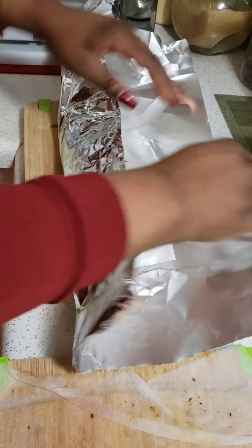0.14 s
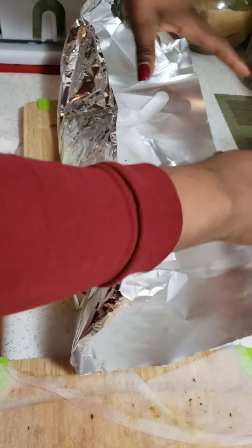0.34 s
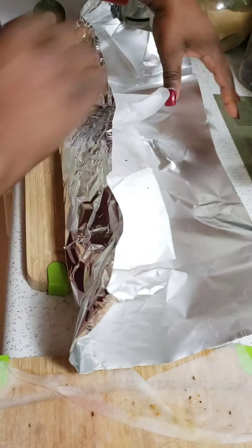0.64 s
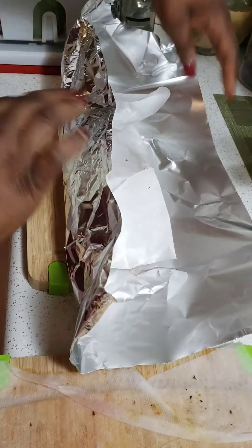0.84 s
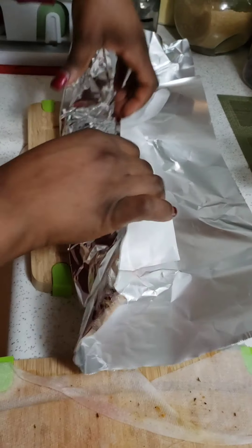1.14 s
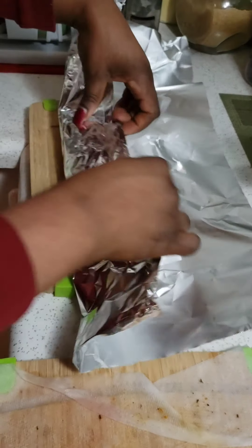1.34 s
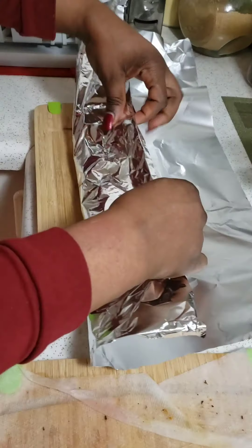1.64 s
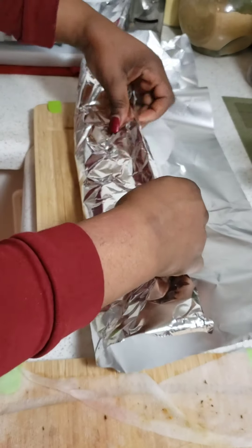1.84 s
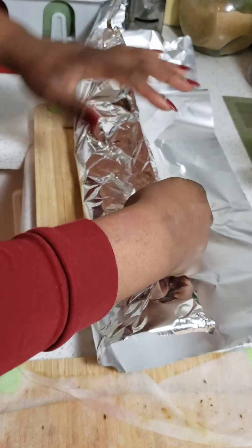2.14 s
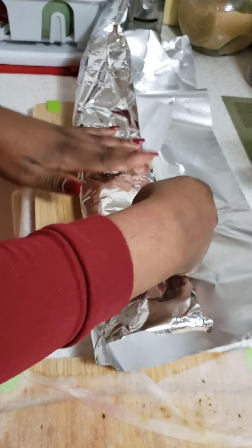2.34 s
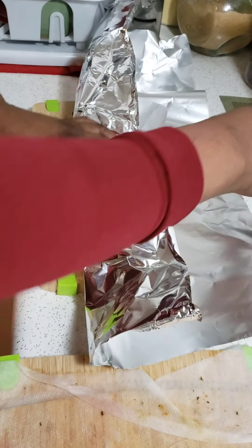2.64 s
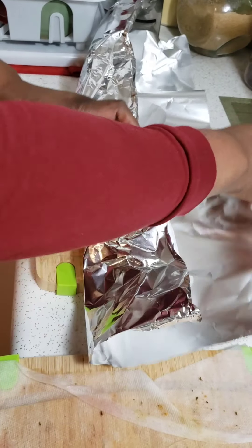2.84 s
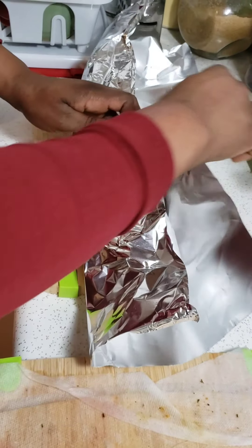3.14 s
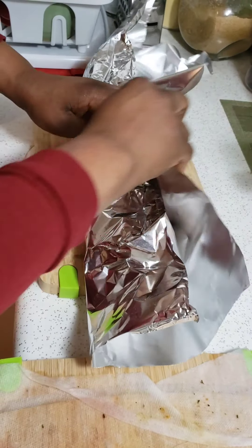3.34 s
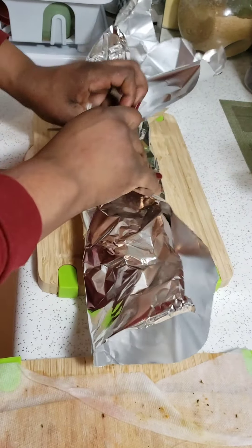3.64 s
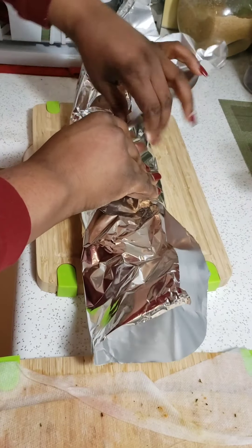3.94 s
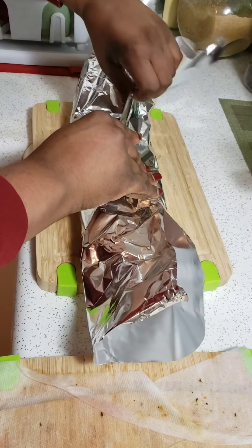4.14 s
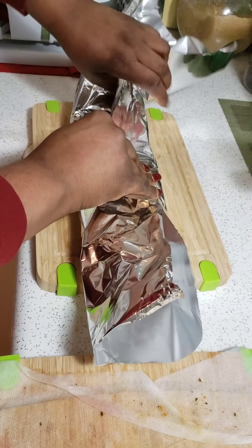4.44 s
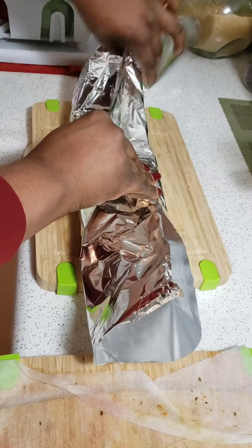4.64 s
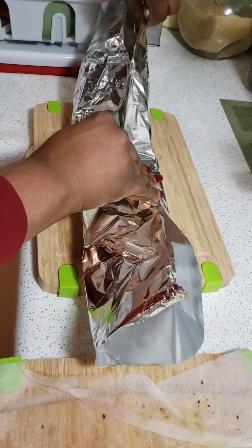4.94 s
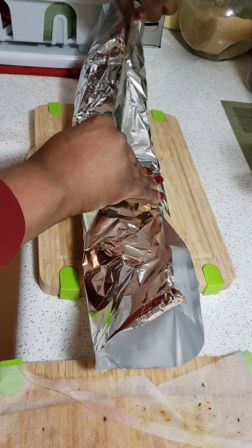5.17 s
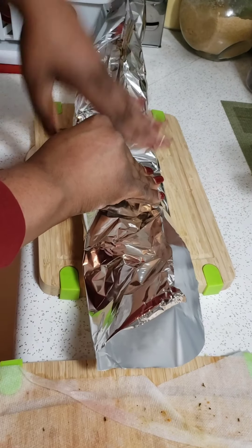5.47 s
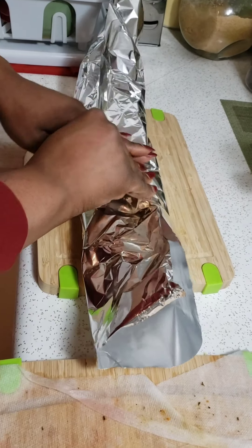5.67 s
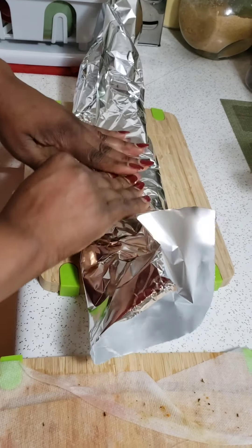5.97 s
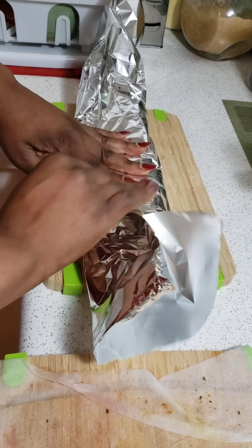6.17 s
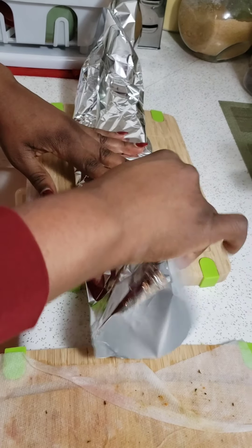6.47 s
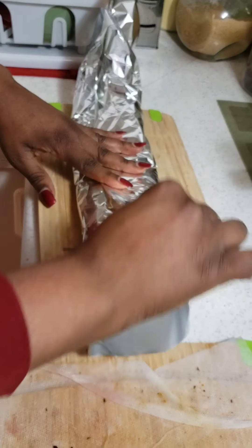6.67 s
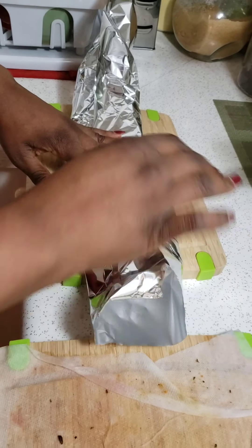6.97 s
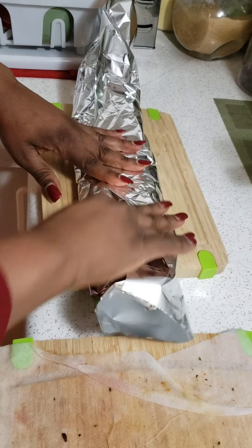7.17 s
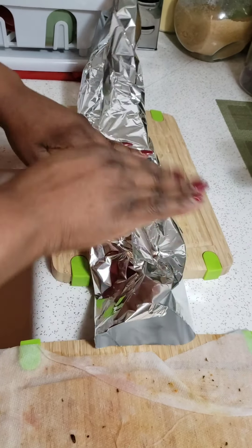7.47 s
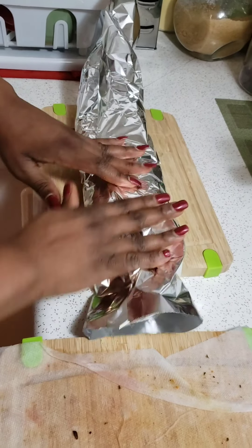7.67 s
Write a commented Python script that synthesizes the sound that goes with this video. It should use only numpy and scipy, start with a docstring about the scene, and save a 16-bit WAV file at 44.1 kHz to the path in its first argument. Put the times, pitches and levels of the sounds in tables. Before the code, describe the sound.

Two hands wrap a parcel in metal foil on a kitchen counter. Thin, dry crinkles swarm in short bursts, with sharp single ticks, tiny metallic pings and muffled pats on the board. Early handling is sparse, the middle is busy and bright, and the strongest crunches come late. Recorded very close in stereo, with short room reflections and a quiet low background.

```python
"""Aluminium foil is folded and pressed by two hands round food on a board in a small kitchen, with short
pauses. Swarms of creases buckle and ring the sheet's dense modes (decaying noise bands); folds give way in
short avalanches. Presses thud softly (pitched noise bursts); lone creases and sharp fold snaps tick (noise) and
taut facets ping (decaying sines). Low rumble, quiet room noise and short reverberation lie beneath. Close
stereo microphone with two differently coloured ports."""
import sys
import numpy as np
from scipy import signal
from scipy.fft import rfft, irfft, next_fast_len
from scipy.io import wavfile
from scipy.ndimage import uniform_filter1d

SR = 44100
rng = np.random.default_rng(int(sys.argv[2]) if len(sys.argv) > 2 else 0)


def master_out(mix):
    """Clip the mix to full scale and print it as 16-bit PCM to the path in sys.argv[1]."""
    frames = np.transpose(np.atleast_2d(mix))
    ceiling = np.clip(frames, -1, 1)
    pcm = np.round(ceiling * 32767).astype(np.int16)
    wavfile.write(sys.argv[1], SR, pcm)


N = 344421

# strokes of the hands (grip, fold or pat): [start t/s, swell/s, hold/s, relative crinkle level at crest/dB,
# relative treble of sharp creases/dB, relative body of flexing sheet/dB]
HAND_STROKES = [(-0.03, 0.036, 0.14, -36.5, -5.5, -12.5), (0.089, 0.029, 0.035, -33.5, -5.5, -14),
                (0.232, 0.0062, 0.08, -41.0, -7.5, -16), (0.532, 0.013, 0.035, -46, -11, -4),
                (0.554, 0.022, 0.021, -44.5, -8.0, -8), (1.11, 0.02, 0.11, -41.0, -9, -6),
                (1.209, 0.03, 0.12, -29, -7, -14), (1.359, 0.01, 0.012, -33.0, -6, -17),
                (1.378, 0.055, 0.15, -29.0, -5.5, -12.0), (1.605, 0.045, 0.049, -32.0, -3.5, -11.5),
                (1.689, 0.015, 0.074, -29.5, -7.5, -11.5), (1.735, 0.035, 0.038, -31.5, -5, -14),
                (1.887, 0.029, 0.091, -38.5, -7, -11.5), (1.98, 0.077, 0.048, -36.5, -5, -5),
                (2.148, 0.048, 0.062, -47.5, -5.5, -14.0), (2.349, 0.03, 0.18, -32.5, -4, -13),
                (2.581, 0.094, 0.008, -44.0, -6, -12), (2.718, 0.054, 0.098, -40.5, -3.0, -17.5),
                (2.844, 0.1, 0.0518, -25.5, -2.5, -22), (2.996, 0.088, 0.05, -27.0, 2, -20.5),
                (3.148, 0.12, 0.17, -31.5, -0.5, -15), (3.438, 0.046, 0.076, -31.0, 0.5, -18),
                (3.597, 0.016, 0.26, -34.0, -4.0, -10.5), (3.83, 0.025, 0.035, -37.5, -3, -16),
                (3.949, 0.013, 0.03, -43.0, -1, -12), (3.995, 0.012, 0.06, -39.0, -5, -12),
                (4.067, 0.054, 0.09, -29.5, 0.5, -13.5), (4.221, 0.043, 0.14, -29.0, -4, -10.0),
                (4.414, 0.036, 0.15, -29.5, -3.0, -12), (4.593, 0.022, 0.039, -28.5, 0.5, -12.5),
                (4.69, 0.029, 0.068, -29.5, -1, -9.5), (4.739, 0.073, 0.087, -28.0, -2.0, -11.5),
                (4.871, 0.075, 0.127, -33.5, -4.5, -10.5), (5.109, 0.012, 0.027, -38.0, -2.5, -9),
                (5.159, 0.05, 0.047, -34.5, -5, -11), (5.29, 0.055, 0.031, -49.0, -5, -14.5),
                (5.435, 0.0055, 0.081, -48.5, -8, -16.5), (5.529, 0.015, 0.14, -40.0, -7, -6.5),
                (5.629, 0.04, 0.08, -30.5, -3, -11.5), (5.788, 0.03, 0.13, -33.0, -3, -14.5),
                (5.895, 0.035, 0.12, -32.5, -5.5, -12.5), (6.078, 0.069, 0.022, -35.5, -8, -6),
                (6.201, 0.014, 0.1, -37.5, -8, -16), (6.389, 0.041, 0.14, -29.0, -1.5, -13),
                (6.575, 0.035, 0.032, -31.0, -2, -11.5), (6.684, 0.026, 0.0372, -23.5, -2.5, -12.5),
                (6.752, 0.084, 0.12, -31, -3.5, -14.5), (7.108, 0.015, 0.093, -37.5, -7, -15),
                (7.125, 0.065, 0.15, -25.5, -6, -13.0), (7.339, 0.061, 0.043, -28.0, -3.5, -15.5),
                (7.458, 0.069, 0.206, -38.5, -5, -8), (7.681, 0.026, 0.03, -26.5, -5, -12.0),
                (7.748, 0.035, 0.021, -26.5, -3.5, -15.5)]
# where the foil is worked: [t/s, relative left-right balance/dB]
WORK_PLACE = [(0.0, 1), (1.3, 2), (1.8, 1.5), (3.1, 0.5), (4.15, 0.7), (5.3, 1.5), (6.65, -0.7),
              (7.81, 0.8)]
# heavy presses of the palm: [t/s, relative level/dB, panel f/Hz]
PALM_PRESSES = [(0.102, -35, 109), (1.304, -36, 102.8), (1.744, -35, 277.5), (2.055, -40, 124.9),
                (2.387, -32, 133), (3.118, -28, 257), (3.235, -32, 218.5), (3.479, -31, 213),
                (4.253, -31, 283), (4.32, -29, 300), (4.515, -33, 112), (4.619, -28, 120.9),
                (4.782, -35, 336.4), (4.873, -30, 177.7), (4.994, -30.5, 212.8), (5.932, -31, 260),
                (6.33, -44, 279.7), (6.42, -38, 258), (6.507, -27.5, 285.4), (6.588, -33, 130.7),
                (6.71, -24, 181.1), (7.203, -31, 271.5), (7.385, -34, 182.4)]
# dry ticks, from lone creases springing back and a few sharp fold snaps: [t/s, relative level/dB, relative
# treble/dB]
DRY_TICKS = [(0.4213, -37.5, -22), (0.834, -49, -32), (0.943, -44, -18), (1.094, -48, -27),
             (1.1434, -28, -28), (2.2588, -43, -19), (2.3151, -38.5, -24), (2.734, -32.5, -13),
             (2.951, -18, -20), (3.122, -23, -7), (3.892, -29, -18), (4.087, -23, -6), (5.345, -35, -7),
             (5.436, -31.5, -10), (5.881, -20.5, -16), (6.144, -20.5, -18), (6.169, -28, -24),
             (6.716, -12.5, -19)]
# radiation of the foil: [f/Hz, relative level/dB]
FOIL_RADIATION = [(30, -30), (60, -3), (125, -6.5), (190, -6.5), (280, -4), (450, -5.5), (750, -4),
                  (1200, -3), (2500, -1), (4200, -0.5), (7000, -7), (10000, -12), (16000, -18.5)]
# resonances of the hollow parcel: [f/Hz, width/Hz, lift/dB]
PARCEL_MODES = [(121, 38, 3), (283.4, 29, 3.5), (721, 88, 4.5), (980, 94, 1.5), (2560, 160, 1.5)]
# background spectrum of the room: [f/Hz, relative level/dB]
ROOM_NOISE = [(25, -19), (70, 16), (145, -17), (850, -13), (2500, -7), (7000, -21), (10000, -27),
              (16000, -29.5)]
# kitchen reverberation: [f/Hz, t60/s]
KITCHEN_T60 = [(150, 0.31), (1000, 0.22), (3200, 0.25), (6400, 0.21), (12000, 0.14)]
# colour of the left port: [f/Hz, level/dB]
LEFT_COLOUR = [(250, -2.37), (1000, -0.43), (3000, 0.38), (5000, -1.5), (6500, 0), (7600, 0.5), (8500, -6),
               (11500, -3.5), (13700, -0.5), (15500, -4)]
# colour of the right port: [f/Hz, level/dB]
RIGHT_COLOUR = [(250, -2.5), (1000, -2.96), (3000, -3.5), (4700, -2.5), (6500, 1), (7200, -1), (7750, -7),
                (8250, 3), (8700, 4.5), (10300, -2.5), (11800, 8.5), (13000, 3.5), (14700, 9.5),
                (15600, 8.5)]

# fading stroke: sharp creases stop first, flexing last (dB per dB of fading), over this range
DULLING_DB_PER_DB, FLEX_LINGER_DB_PER_DB, FADE_RANGE_DB = 0.59, 0.28, 18
# faint settling under resting hands, on the scale of the crinkle levels
REST_DB = -76
# past its crest a stroke sags as the foil yields; after the hold it also lets go
SAG_DB_PER_S, RELEASE_DB_PER_S = 20, 199.5
CUTOFF_HZ = 15800


def from_db(db):
    """Decibels to gain."""
    return 10 ** (np.asarray(db) / 20)


def rms_one(x):
    """Scale to rms 1."""
    return x / np.sqrt(np.mean(x ** 2) + 1e-20)


def in_time(rows):
    """Interpolate columns of a curve (first column t/s), sample by sample."""
    t_s, *columns = np.transpose(rows)
    return [np.interp(np.arange(N) / SR, t_s, column) for column in columns]


def at_hz(points, hz):
    """Read a table on a log-frequency axis."""
    f_hz, value = np.transpose(points)
    return np.interp(np.log(hz + 1e-3), np.log(f_hz), value)


def shaped(x, gain_at):
    """Filter by a smooth gain over frequency."""
    size = next_fast_len(x.shape[-1] + 2048, True)
    hz = np.arange(size // 2 + 1) * SR / size
    return irfft(rfft(x, size) * gain_at(hz), size)[..., :x.shape[-1]]


def coloured(x, spectrum):
    """Filter by an (f/Hz, level/dB) table."""
    return shaped(x, lambda hz: from_db(at_hz(spectrum, hz)))


def passed(x, hz, kind, order=2):
    """Butterworth filter."""
    sos = signal.butter(order, np.clip(hz, 10, .45 * SR), kind, fs=SR, output="sos")
    return signal.sosfilt(sos, x + 1e-18)


def dying(t_s, t60_s):
    """Exponential decay, 60 dB down after t60."""
    return np.exp(-np.log(1000) * t_s / max(t60_s, 1e-3))


def drift(knots_per_s):
    """Slow random wander with a spread near 1."""
    knots = rng.standard_normal(4096)
    return np.interp(np.arange(N) / SR * knots_per_s, np.arange(len(knots)), knots)


def ambience():
    """Quiet room background: steady coloured noise."""
    return from_db(-65) * rms_one(coloured(rng.standard_normal((2, N)), ROOM_NOISE))


def stirred_air():
    """Low-frequency air noise, independent at each port."""
    return from_db(-76.0) * rms_one(passed(rng.standard_normal((2, N)), [25, 110], "band"))


def handling():
    """Power-sum the strokes, sample by sample: relative crinkle/dB, treble/dB, body/dB."""
    t_s = np.arange(0, N, 44) / SR
    start_s, swell_s, hold_s, crest_db, treble_db, body_db = np.transpose(HAND_STROKES)[:, :, None]
    grip = np.clip((t_s - start_s) / np.maximum(swell_s, 1e-3), 0, 1)
    past_crest_s = t_s - start_s - swell_s
    sag_db = SAG_DB_PER_S * np.maximum(past_crest_s, 0)
    release_db = RELEASE_DB_PER_S * np.maximum(past_crest_s - hold_s, 0)
    faded_db = sag_db + release_db
    power = (grip * from_db(crest_db - faded_db)) ** 2 + 1e-30
    # the strongest stroke dominates the tone
    share, slack_db = power / power.sum(0), np.minimum(faded_db, FADE_RANGE_DB)
    hand_db = 10 * np.log10(power.sum(0) + from_db(REST_DB) ** 2)
    sharp_db = (share * (treble_db - DULLING_DB_PER_DB * slack_db)).sum(0)
    flex_db = (share * (body_db + FLEX_LINGER_DB_PER_DB * slack_db)).sum(0)
    return in_time(np.column_stack([t_s, hand_db, sharp_db, flex_db]))


def jostle(level_db=-24.5, follow_db_per_db=0.7):
    """Moving hands keep board and counter rumbling faintly: low noise follows the crinkle level."""
    effort = from_db(follow_db_per_db * (handling()[0] + 35.5) - 36)
    return from_db(level_db) * effort * rms_one(passed(rng.standard_normal(N), [38, 95], "band"))


def creases(level_db=8.0, bright_db=6.5, body_db=10.0, base_per_s=900, size_db=4.0, clump_db=3.0):
    """Creases buckle in clumps, many small, few large, more under a harder hand: (sample, dB, treble dB, body dB)."""
    hand_db, sharp_db, flex_db = handling()
    rate_per_s = base_per_s * from_db(.3 * (hand_db + 35) + clump_db * drift(90))
    born = rng.random(N) < rate_per_s / SR
    size = born * from_db(size_db * np.minimum(rng.exponential(1, N), 4))
    # the work of the hand is shared among the creases of the moment
    power = uniform_filter1d(uniform_filter1d(size ** 2, size=1100), size=1100)
    at = np.flatnonzero(born)
    crease_db = level_db + hand_db[at] + 10 * np.log10(size[at] ** 2 / power[at])
    return np.column_stack([at, crease_db, sharp_db[at] + bright_db, flex_db[at] + body_db])


def rung(energy, t60_s):
    """Energy put into the sheet leaks away exponentially."""
    keep = dying(2 / SR, t60_s)  # 2: energy is amplitude squared, so its exponential decay rate is twice that of amplitude
    return signal.lfilter([1 - keep], [1, -keep], energy + 1e-18)


def sheet(buckles, crack_t60_s=0.002, ring_t60_s=0.063, ring_share=0.85, low_lasting=0.04,
          uneven_db=3.0, shifting_db=1.5):
    """Creases strike the foil's crowded modes, each in its own colour: a crack and a ring, longer in the lows."""
    at, crease_db, treble_db, body_db = buckles.T
    at = np.clip(at, 0, N - 1).astype(int)
    out, white = np.zeros((2, N)), rng.standard_normal((2, 2, N))
    share = np.clip(ring_share, 0, 1)
    edges_hz = np.geomspace(90, 17000, 15)
    for k, (low_hz, high_hz) in enumerate(zip(edges_hz, edges_hz[1:])):
        hz = np.sqrt(low_hz * high_hz)
        body, treble = 1 / (1 + (hz / 1000) ** 3), 1 / (1 + (7000 / hz) ** 4)
        # the colour differs from crease to crease and shifts as the sheet changes shape
        colour_db = uneven_db * rng.standard_normal(len(at)) + shifting_db * drift(16)[at]
        strike = from_db(crease_db + treble * treble_db + body * body_db + colour_db)
        energy, lasting = np.bincount(at, strike ** 2, N), (4000 / hz) ** low_lasting
        crack = (1 - share) * rung(energy, crack_t60_s * lasting)
        ring = share * rung(energy, ring_t60_s * lasting)
        out += np.sqrt(crack + ring) * passed(white[k % 2], [low_hz, high_hz], "band")
    return coloured(out, FOIL_RADIATION)


def parcel(x):
    """Wrapped food and trapped air lift a few narrow bands."""
    for hz, width_hz, lift_db in PARCEL_MODES:
        b, a = signal.iirpeak(hz, hz / max(width_hz, 5), fs=SR)
        x = x + (from_db(lift_db) - 1) * signal.lfilter(b, a, x)
    return x


def nudges(level_db=-3.0, panel_hz=285, spread_octaves=0.15):
    """Halfway up its swell every stroke leans lightly on a panel: (t/s, relative level/dB, f/Hz)."""
    start_s, swell_s, _, hand_db, _, flex_db = np.transpose(HAND_STROKES)
    hz = panel_hz * 2 ** (spread_octaves * rng.standard_normal(len(start_s)))
    return np.column_stack([start_s + swell_s / 2, level_db + hand_db + flex_db, hz])


def presses(level_db=-7.5, rise_s=0.0023, t60_s=0.19, width=0.27):
    """A soft palm flexes a panel against the board: a dull, loosely pitched thud of band noise."""
    out, t_s = np.zeros(N + SR), np.arange(SR // 3) / SR
    push = (1 - np.exp(-t_s / rise_s)) * dying(t_s, t60_s)
    for start_s, press_db, hz in np.vstack([PALM_PRESSES, nudges()]):
        band_hz = [hz / (1 + width), hz * (1 + width)]
        # first half discarded: filter settling
        panel = passed(rng.standard_normal(2 * len(t_s)), band_hz, "band")[len(t_s):]
        thud = push * panel * np.linalg.norm(push) / np.linalg.norm(push * panel)
        at = max(round(start_s * SR), 0)
        out[at:at + len(t_s)] += from_db(press_db + level_db) * thud
    return out[:N]


def folds(level_db=30.5, bright_db=8.5, lead_s=0.003, t60_s=0.06, swell=0.06, count=60):
    """Just before each stroke's crest a fold gives way: a swelling, then dying avalanche; rows as in creases()."""
    body_db, size_db = 10, 2.5
    rows = []
    for start_s, swell_s, _, hand_db, sharp_db, flex_db in HAND_STROKES:
        t_s = t60_s * (np.arange(count) + rng.random(count)) / count
        course = dying(t_s, t60_s) * (1 - np.exp(-t_s / (swell * t60_s)))
        size = course * from_db(size_db * rng.standard_normal(count))
        crease_db = level_db + hand_db + 20 * np.log10(size / np.linalg.norm(size))
        at = (start_s + swell_s - lead_s + t_s) * SR
        rows.append(np.column_stack([at, crease_db, np.full(count, sharp_db + bright_db),
                                     np.full(count, flex_db + body_db)]))
    return np.vstack(rows)


def pings(level_db=-3.5, per_s=30, cycles=110, size_db=2.5):
    """At random a taut facet pops through and rings as a decaying sine at its own pitch."""
    hand_db = handling()[0]
    out, t_s = np.zeros((2, N + SR)), np.arange(4096) / SR
    for at in np.flatnonzero(rng.random(N) < per_s / SR):
        hz = 2600 * 2 ** np.clip(.6 * rng.standard_normal(), -2, 1)
        phase = rng.uniform(0, 2 * np.pi, (2, 1))
        size = from_db(level_db + hand_db[at] + size_db * rng.standard_normal())
        ring = np.sin(2 * np.pi * hz * t_s + phase) * dying(t_s, min(cycles / hz, .08))
        out[:, at:at + len(t_s)] += size * ring
    return out[:, :N]


def ticks(level_db=-4.5, bright_db=12.5, t60_s=0.049, low_hz=1100):
    """A lone crease springs back or a fold snaps sharply: one dry tick of decaying noise with an instant
    attack."""
    out, t_s = np.zeros((2, N + SR)), np.arange(4096) / SR
    for start_s, tick_db, sharp_db in DRY_TICKS:
        modes = coloured(rng.standard_normal((2, len(t_s))), FOIL_RADIATION)
        modes = passed(modes, low_hz, "high")
        modes = coloured(modes, [(4000, 0), (9000, sharp_db + bright_db)])
        at = round(start_s * SR)
        out[:, at:at + len(t_s)] += from_db(tick_db + level_db) * rms_one(modes) * dying(t_s, t60_s)
    return out[:, :N]


def kitchen(x, wet_db, onset_s=0.0011, wander_per_s=22, count=10):
    """Diffuse reflections off counter and walls, t60 by band; the pattern shifts as hands and foil move."""
    t_s = np.arange(SR // 2) / SR
    edges_hz = np.geomspace(60, 18000, 11)
    tails = 0
    for low_hz, high_hz in zip(edges_hz, edges_hz[1:]):
        noise = passed(rng.standard_normal((count, 2, len(t_s))), [low_hz, high_hz], "band")
        tails = tails + noise * dying(t_s, at_hz(KITCHEN_T60, np.sqrt(low_hz * high_hz)))
    tails = rms_one(tails * (1 - np.exp(-(t_s / onset_s) ** 2))) / np.sqrt(len(t_s))
    # random crossfade between tails at constant power
    shares = np.array([drift(wander_per_s) for _ in tails])
    shares = shares / np.linalg.norm(shares, axis=0)
    wet = sum(signal.oaconvolve(x * share, tail, axes=1)[:, :N] for share, tail in zip(shares, tails))
    return from_db(wet_db) * wet


def port_pair(x, apart_hz=800):
    """Long waves reach both ports alike, short ones differ: the side signal loses its lows."""
    mid, side = (x[0] + x[1]) / 2, (x[0] - x[1]) / 2
    side = shaped(side, lambda hz: hz ** 1.5 / np.sqrt(hz ** 3 + apart_hz ** 3))
    return np.array([mid + side, mid - side])


def scene():
    """Foil and board in the kitchen, over its quiet background."""
    pan_db = 0.96 * (in_time(WORK_PLACE)[0] - 1.0)
    crinkle = parcel(sheet(np.vstack([creases(), folds()])))
    foil = (crinkle + pings()) * from_db(np.array([pan_db, -pan_db]) / 2)
    lone = ticks()
    room = kitchen(foil + from_db(0.5) * lone, wet_db=-5.0)
    mix = from_db(-1.0) * (foil + room) + lone + presses() + jostle() + ambience()
    return port_pair(mix) + stirred_air()


def record(dry):
    """Each port adds its own resonances; the top is cut steeply."""
    heard = np.array([coloured(dry[0], LEFT_COLOUR), coloured(dry[1], RIGHT_COLOUR)])
    return shaped(heard, lambda hz: 1 / np.sqrt(1 + (hz / CUTOFF_HZ) ** 400))


dry = scene()
out = record(dry)
master_out(out)
```